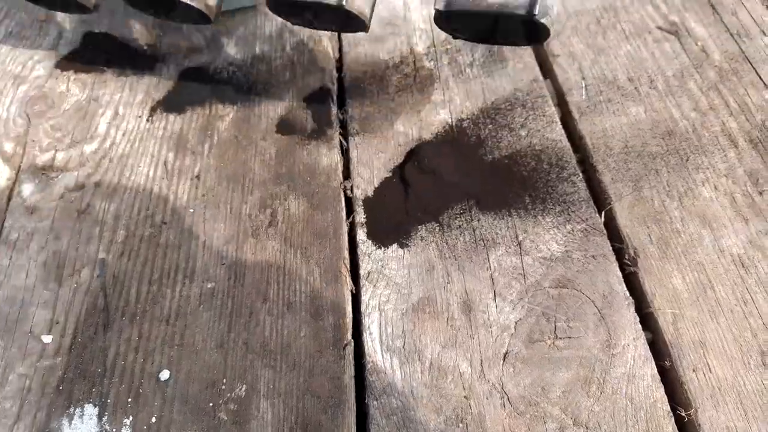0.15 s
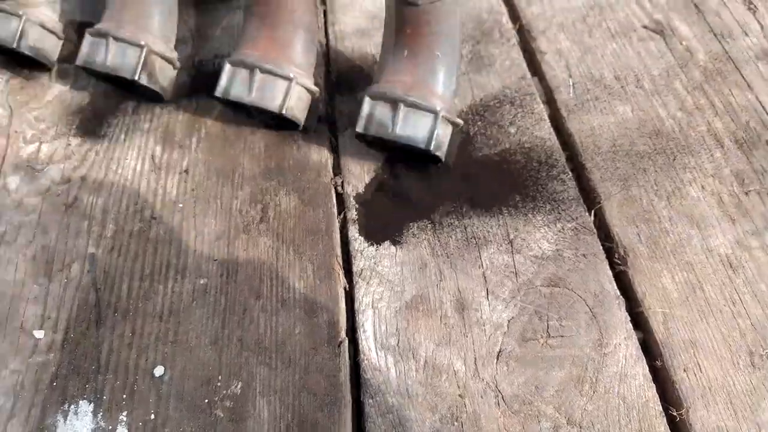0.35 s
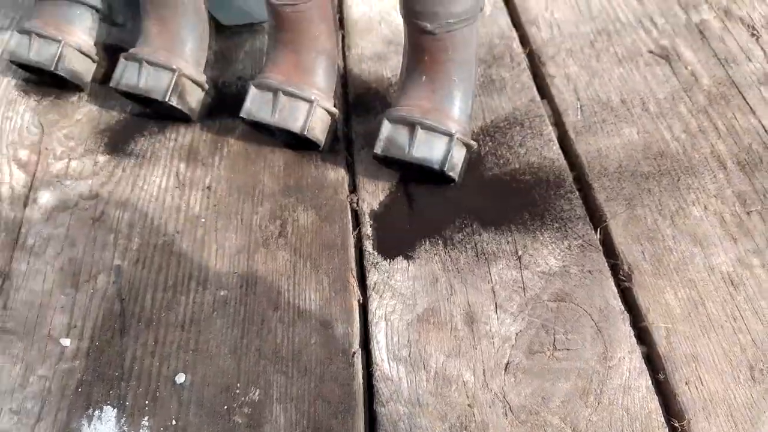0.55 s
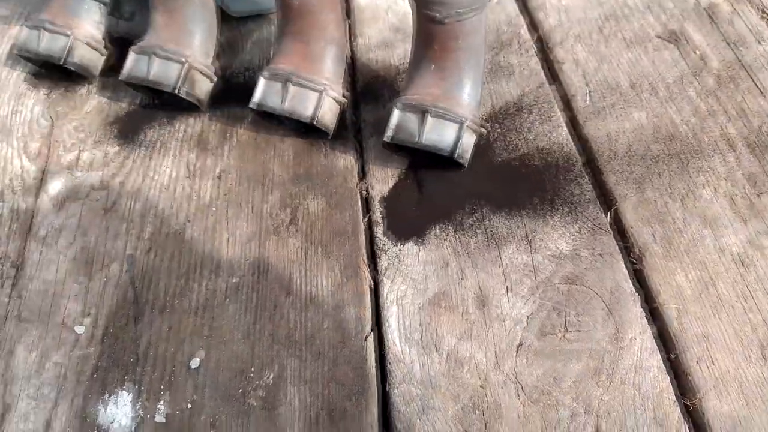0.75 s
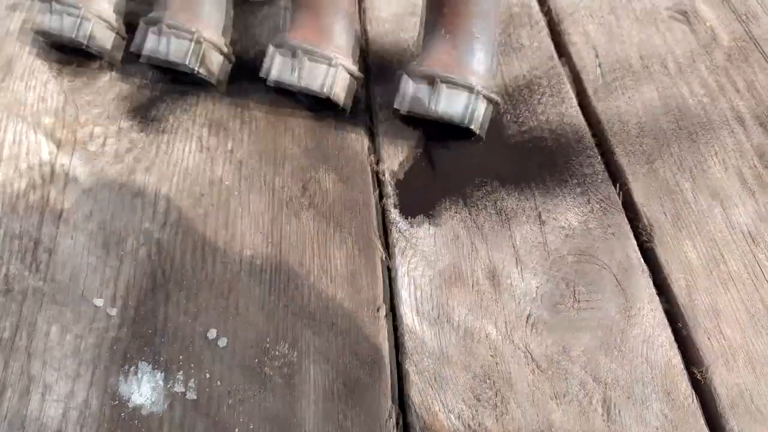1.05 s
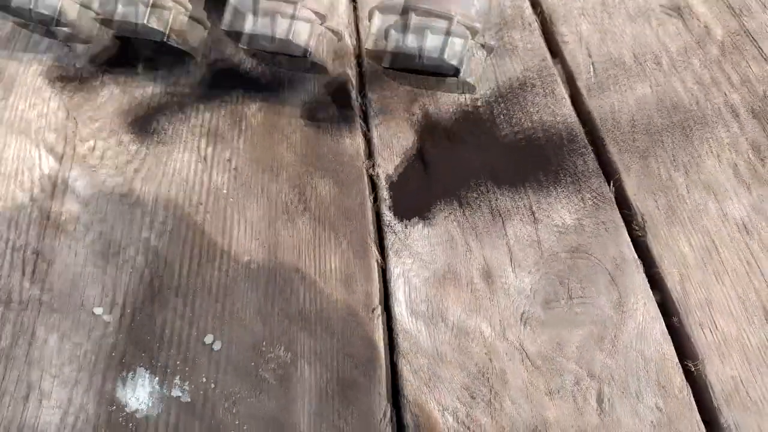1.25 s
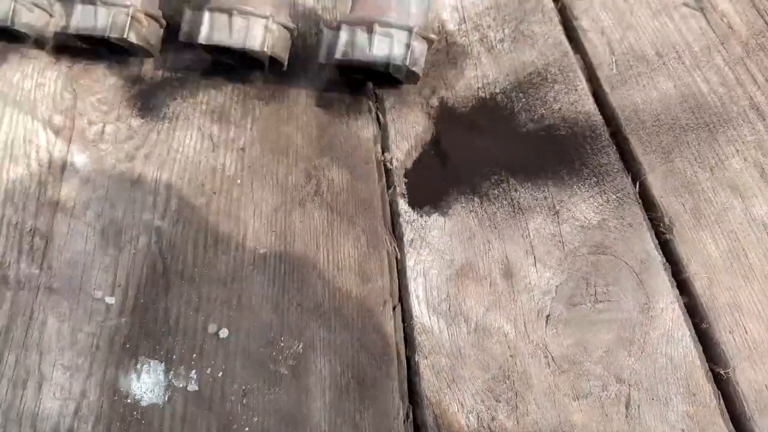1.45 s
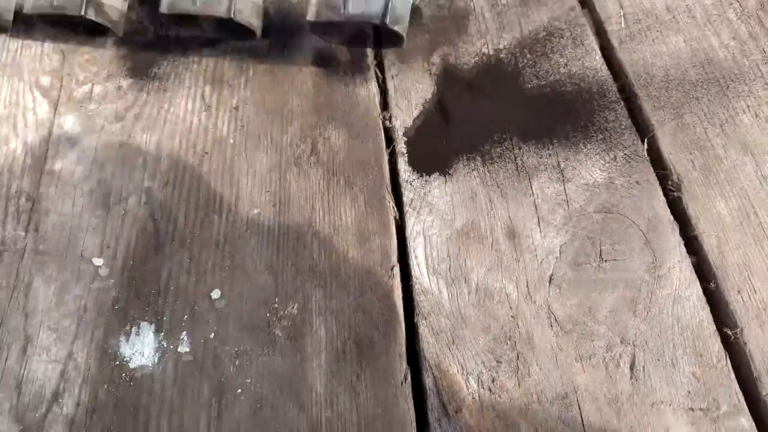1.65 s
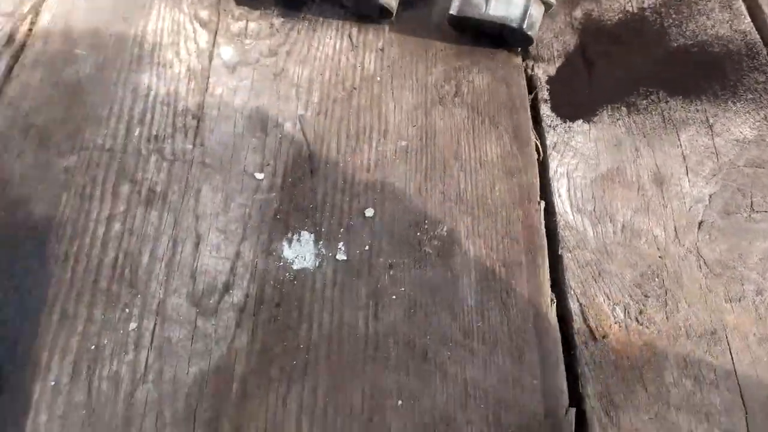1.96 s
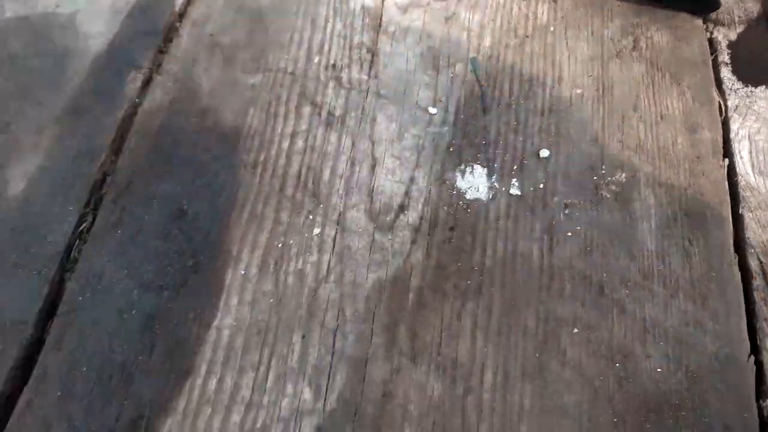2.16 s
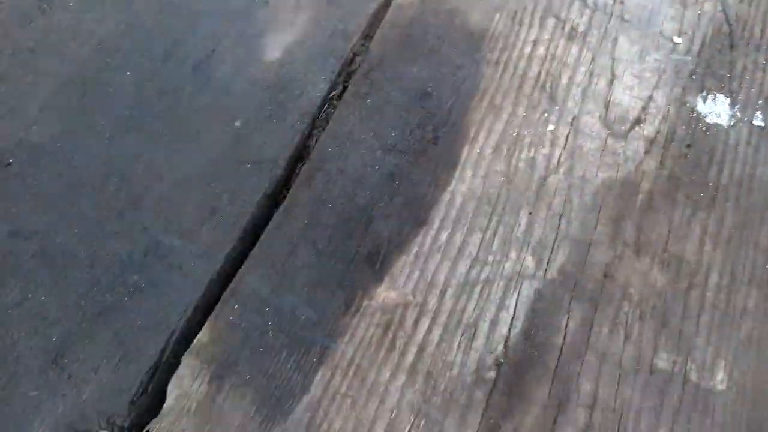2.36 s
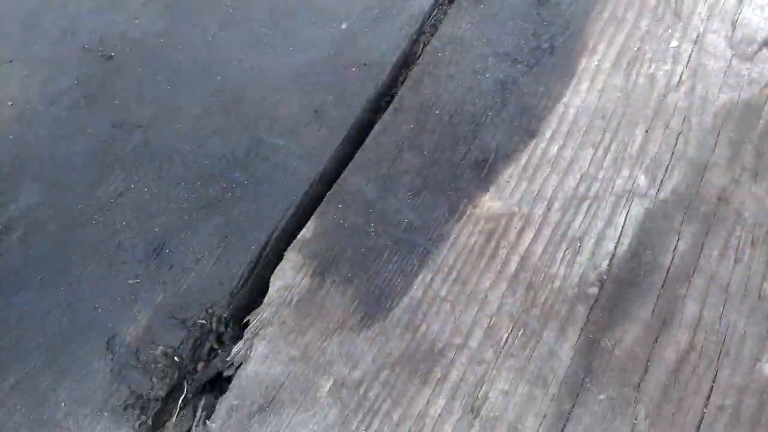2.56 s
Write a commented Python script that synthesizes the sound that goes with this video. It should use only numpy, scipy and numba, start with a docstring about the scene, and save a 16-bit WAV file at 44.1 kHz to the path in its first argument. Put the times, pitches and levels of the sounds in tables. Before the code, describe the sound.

Joined steel pipes clank sharply and clatter onto wooden boards, nearly go quiet, then bounce and rattle in a longer run, with plank thuds and fine grit, close to the microphone outdoors.

```python
"""A sharp steel clank at once, then a clatter: four joined pipes dropped on wooden boards, heard close up. They
all but rest, then bounce and rattle across the boards for longer. Each knock rings decaying pipe modes and
jangles a loose fitting over a run of rebounds. Planks thud with falling sines and booming noise; grit crackles
as sparse grains. A limiter ducks the loud blows, over a low outdoor rumble, a faint hiss and a brief thin tone
near 500 Hz."""
import sys
import numpy as np
from scipy import signal
from scipy.fft import rfft, irfft
from scipy.io import wavfile
from scipy.ndimage import uniform_filter1d
from numba import njit

SR = 44100
rng = np.random.default_rng(int(sys.argv[2]) if len(sys.argv) > 2 else 0)


def to_wav(s):
    """Save 16-bit WAV."""
    ch = np.atleast_2d(s).T  # columns
    pcm = np.round(np.clip(ch, -1, 1) * 32767)  # PCM
    wavfile.write(sys.argv[1], SR, pcm.astype(np.int16))


N = 119070
T = np.arange(N) / SR
AGE = T[:SR * 3 // 5]  # time since a blow, s
TOP_HZ = 15800


def undb(db):
    """Decibels to gain."""
    return 10 ** (np.asarray(db) / 20)


def fade(t60_s):
    """Exponential decay after a blow, -60 dB at t60_s."""
    return np.exp(-np.log(1000) * AGE / t60_s)


def add(out, start_s, sound):
    """Mix a sound in at a time."""
    i = max(int(start_s * SR), 0)
    out[..., i:i + sound.shape[-1]] += sound[..., :N - i]


def curve(points, hz, axis=1):
    """Read a table column on a log-frequency axis."""
    p = np.array(points, float)
    return np.interp(np.log(hz + 1), np.log(p[:, 0]), p[:, axis])


def noise(size):
    """Two unrelated white noises."""
    return rng.standard_normal((2, size))


# stereo image: f/Hz, side re mid/dB, left minus right/dB
IMAGE = [(40.4, 3, -3), (149, -11, -2.5), (510, -3.5, -2.5), (1300, 2, 0), (2170, 2.5, 3.5),
         (2900, -1.5, -1), (8160, 0.5, -0.5), (10040, 1, -21.5), (9380, -1, 0.5)]


def colour(white, points):
    """Give two unrelated signals a spectrum and the stereo image, at rms 1."""
    n = white.shape[-1]
    hz = np.fft.rfftfreq(n, 1 / SR)
    mid, side = rfft(white) * undb(curve(points, hz))
    width = undb(curve(IMAGE, hz))
    sign = np.array([[1], [-1]])  # left, right
    balance = undb(sign * curve(IMAGE, hz, axis=2) / 2)
    stereo = (mid + sign * width * side) / np.hypot(1, width)
    y = irfft(stereo * balance, n)
    return y / y.std()


def tilt(x, low_db, treble_db):
    """Shelve the low mids and the treble around the clang at 2-3 kHz."""
    n = x.shape[-1]
    shelf = [(1000, low_db), (1900, 0), (3200, 0), (6500, treble_db)]
    return irfft(rfft(x) * undb(curve(shelf, np.fft.rfftfreq(n, 1 / SR))), n)


# spectrum of cracks and fittings: f/Hz, level/dB per Hz
CLANK = [(40, -10.5), (130, -7.5), (250, -12), (500, -9), (830, -4), (1030, -12), (1250, -5), (1600, -2.5),
         (2200, 1.5), (2900, -0.5), (3600, -12.5), (4600, -8.5), (5250, -12.5), (6300, -5.5), (7800, -2),
         (9200, -3), (10300, -9.5), (11000, -18.5), (12200, -14.5), (15500, -44)]
# modes of each pipe, by name: f/Hz, level/dB, t60/s
PIPES = { "A": [(790, -12, .25), (1810, -2, .15), (2197, -7, .22), (2228, -24, 1.1), (2740, 0, .19),
         (2775, -17, .5), (3973, -31, .7), (6255, -14, .35), (6912, -7, .16), (8263, -5, .16)],
         "B": [(775, -8, .35), (904, -9, .3), (1480, -1, .22), (1914, -4, .18), (2718, -4, .18),
         (2837, -8, .2), (3068, -2, .28), (5992, -6, .22), (6718, -5, .18), (8178, -2, .2), (8258, -2, .28),
         (9308, -2, .2)], "C": [(1235, -7, .2), (1850, -4, .22), (2126, -1, .2), (2250, 0, .2),
         (2444, -4, .15), (2631, -3, .15), (2842, -5, .38), (6202, -9, .2), (7445, -1, .22), (8301, -4, .3),
         (9012, -1, .18)], "D": [(1249, -3, .25), (1825, -4, .15), (2058, 0, .15), (2276, 1, .15),
         (2848, 4.5, .29), (3192, 0, .28), (7603, 2, .17)]}
# pipe knocks: t/s, level/dB, low mids/dB, treble/dB, ring/dB, rattle length/s, pipe name
KNOCKS = [(0.0174, -16.5, -8, -6.5, -5, 0.0035, "A"), (0.161, -47, 17, 10, -19, 0.098, "A"),
          (0.204, -31.5, 11.5, -6, -21, 0.027, "A"), (0.2233, -7.5, -9, -0.5, -3, 0.007, "A"),
          (0.247, -10, 12, -1, -25, 0.012, "A"), (.258, -8, 0.5, -0.5, -28, 0.068, "A"),
          (0.3, -13, 9, -13, -27, 0.012, "A"), (0.324, -10, 7, -3, -21, 0.052, "A"),
          (0.36, -9.5, -10.5, -4, -3, 0.016, "A"), (0.389, -20.5, 14, 8, -15, 0.013, "A"),
          (0.506, -24.5, 0.5, -0.5, -3, 0.0026, "A"), (0.62, -37, 5, 4, -7, 0.0096, "A"),
          (1.077, -46.5, 7.5, -21, -7, 0.016, "A"), (1.399, -28.5, 1.5, -1.5, -21, 0.03, "B"),
          (1.417, -6.5, 2, -3, -29, 0.012, "B"), (1.44, -10, -4, -3, 0, 0.019, "B"),
          (1.471, -7, 0.5, -2, -20, 0.04, "B"), (1.507, -6, 1, -4.5, -13, 0.036, "B"),
          (1.529, -12.5, 2.5, -2.5, -1.5, 0.041, "B"), (1.602, -15, 2, 1, -2.5, 0.04, "B"),
          (1.652, -16.5, -1.5, 2.5, 2, 0.032, "B"), (1.674, -6, 2, 0, -18, 0.0057, "B"),
          (1.693, -7.5, -1, -5, -14, 0.045, "B"), (1.729, -13.5, 4.5, -1, -4, 0.033, "B"),
          (1.763, -9, 2.5, -1.5, -20, 0.038, "B"), (1.807, -11, 4, -4.5, -10, 0.052, "B"),
          (1.83, -9, 1.5, 0, -24, 0.027, "B"), (1.898, -15.5, -6, 3, 0, 0.0094, "B"),
          (1.935, -14.5, -3.5, -3.5, -3.5, 0.063, "C"), (2.02, -9, -3.5, -0.5, -1.5, 0.022, "C"),
          (2.053, -10.5, -5, 2, -24, 0.017, "C"), (2.071, -7, 0.5, 0.5, -14, 0.019, "C"),
          (2.1, -19, -1, 4, 3, 0.099, "C"), (2.164, -8, -4.5, -5.5, -7, 0.057, "C"),
          (2.202, -11.5, -2, 2, -22, 0.065, "C"), (2.233, -4.5, 3.5, 1, -2.5, 0.0062, "C"),
          (2.2808, -8.5, -35, -8, -2, 0.0031, "C"), (2.31, -31, -12, 3, 0.5, 0.087, "C"),
          (2.364, -23.5, 0, 10, 3, 0.024, "D"), (2.388, -5.5, -0.5, 0, -6.5, 0.015, "D")]
RING_DB, NEIGHBOUR_DB = -7.5, -18
CRACK_T60_S, CRACK_DB = .025, -1
FITTING_DB = -0.5


def pipes():
    """Each contact cracks and jangles a fitting; the struck pipe and joined frame ring up over rebounds."""
    out = np.zeros((2, N))
    rings = {name: ring(modes) for name, modes in PIPES.items()}
    frame = undb(NEIGHBOUR_DB) * sum(rings.values())
    fittings = {name: fitting() for name in PIPES}
    cracks = colour(noise(N), CLANK)
    snap = undb(CRACK_DB) * fade(CRACK_T60_S)
    end_fade = np.minimum(1, 10 * (AGE[-1] - AGE))
    for start_s, db, low_db, treble_db, ring_db, length_s, name in KNOCKS:
        start = rng.integers(N - len(AGE))
        force = contacts(length_s)
        crack = cracks[:, start:start + len(AGE)] * snap
        clank = crack + undb(FITTING_DB) * jangle(*fittings[name])
        rattle = signal.fftconvolve(clank, force[None], axes=1)[:, :len(AGE)]
        build_up = np.sqrt(np.cumsum(force ** 2))
        tone = undb(RING_DB + ring_db) * (rings[name] + frame) * build_up
        add(out, start_s, undb(db) * tilt(rattle + tone, low_db, treble_db) * end_fade)
    return out


def ring(modes):
    """One pipe's decaying modes, each reaching the two sides a quarter cycle apart."""
    out = 0
    for hz, db, t60_s in modes:
        quarter = rng.choice([-1, 1]) * np.array([[0], [np.pi / 2]])
        phase = rng.uniform(0, 2 * np.pi) + quarter
        out = out + undb(db) * np.sin(2 * np.pi * hz * AGE + phase) * fade(t60_s)
    return out


RATTLE_PER_S, RATTLE_DB, RATTLE_SCATTER_DB = 220, -5, 4.5


def contacts(length_s):
    """Impulses: a first contact, then up to 40 rebounds of scattered force, dying off past length_s."""
    place, size = rng.random(size=40), rng.standard_normal(size=40)
    when_s = (np.arange(len(place)) + 1 + place) / RATTLE_PER_S
    die_off = 1 / (1 + (when_s / length_s) ** 4) ** .5
    force = undb(RATTLE_DB + RATTLE_SCATTER_DB * size) * die_off
    out = np.zeros(len(AGE))
    out[np.minimum((when_s * SR).astype(int), len(AGE) - 1)] = force
    out[0] = 1
    return out


FITTING_GAP_HZ, FITTING_SCATTER_DB = 65, 4


def fitting():
    """The many modes of a loose fitting, one per frequency slot: pitches in Hz, strengths in dB."""
    slots = np.arange(1, TOP_HZ // FITTING_GAP_HZ)
    hz = (slots + rng.random(len(slots))) * FITTING_GAP_HZ
    return hz, FITTING_SCATTER_DB * rng.standard_normal(len(slots))


FITTING_T60_S, CONTACT_SCATTER_DB = 0.092, 5.5


def jangle(hz, db):
    """Each knock favours other modes of the fitting; the lowest ones answer more evenly."""
    evenness = np.minimum(hz / 1500, 1)
    db = (db + CONTACT_SCATTER_DB * rng.standard_normal(len(hz))) * evenness
    lines = np.zeros((2, len(AGE) // 2 + 1), complex)
    phases = np.exp(2j * np.pi * rng.random((2, len(hz))))
    lines[:, (hz * len(AGE) / SR).astype(int)] = undb(db) * phases
    return colour(irfft(lines, len(AGE)), CLANK) * fade(FITTING_T60_S)


# deck boom spectrum: f/Hz, level/dB per Hz
DECK = [(30, -10), (60, -40), (120, 11), (200, 17.5), (400, -18), (750, -10), (1500, -13.5)]
# plank thuds: t/s, level/dB
THUDS = [(.246, -1.5), (0.656, -35), (0.736, -31.5), (0.755, -32.5), (.985, -43), (1.034, -44),
         (1.162, -40.5), (1.3, -44), (1.326, -38), (1.417, -7.5), (1.531, -47), (1.698, -8.5), (1.821, -18),
         (1.942, -37), (2.235, -17.5), (2.687, -25)]
PLANK_HZ, PLANK_SWEEP_HZ, SWEEP_S, PLANK_T60_S = 156, 280, .008, .11
DECK_DB, DECK_T60_S = -14, .22


def planks():
    """A bending wave drops in pitch and gains weight as it spreads along the plank; the deck booms with it."""
    out = np.zeros((2, N))
    hz = PLANK_HZ + PLANK_SWEEP_HZ * np.exp(-AGE / SWEEP_S)
    weight = np.sqrt(PLANK_HZ / hz)
    bend = -np.sin(2 * np.pi * np.cumsum(hz) / SR) * fade(PLANK_T60_S) * weight
    for start_s, db in THUDS:
        boom = colour(noise(len(AGE)), DECK) * fade(DECK_T60_S)
        add(out, start_s, undb(db) * (bend + undb(DECK_DB) * boom))
    return out


# grit spectrum: f/Hz, level/dB per Hz
GRIT = [(200, 9.5), (800, 11), (2500, 10), (5000, -3), (9000, 2.5), (11000, -6.5), (15500, -25)]
# soft scrapes: centre t/s, length (Gaussian sigma)/s, level/dB, treble/dB
SCRAPES = [(.0, 0.056, -40, 9.5), (0.937, 0.021, -51.5, 17), (1, 0.011, -59, 22),
           (1.381, 0.023, -48.5, 12.5), (2.566, 0.024, -43.5, -5)]
GRIT_PER_S, GRIT_DB, GRIT_FALL_S = 360, -19.5, 0.043


def grit():
    """Sparse grains shaken loose by each knock, and soft scrapes over them."""
    shake = np.zeros(N)  # energy
    for start_s, db, *_ in KNOCKS:
        add(shake, start_s, undb(db) ** 2 * np.exp(-AGE / GRIT_FALL_S * 2))
    grains = noise(N) * (rng.random(N) < GRIT_PER_S / SR)
    out = colour(grains, GRIT) * np.sqrt(shake) * undb(GRIT_DB)
    rub = colour(noise(N) + 10 * grains, GRIT)
    for centre_s, length_s, db, treble_db in SCRAPES:
        swell = np.exp(-.5 * ((T - centre_s) / length_s) ** 2)
        out += tilt(rub, -treble_db, treble_db) * undb(db) * swell
    return out


# rumble and hiss spectra: f/Hz, level/dB per Hz
RUMBLE = [(15, -4), (25, 6.5), (95, -6), (170, -7), (210, -10.5), (281, -23.5), (600, -41), (900, -100)]
HISS = [(350, -27), (600, -1.5), (2000, -5.5), (6400, -7.5), (9120, 2.5), (15500, -22)]
# rumble level: t/s, level re RUMBLE_DB/dB
RUMBLE_LEVEL = [(.1, 4), (.4, 10.5), (.9, 2.5), (1.8, 7.5), (2.05, -1.5), (2.7, -2.5)]
RUMBLE_DB, RUMBLE_WAVER_DB, HISS_DB = -40.5, -0.5, -52.5
TONE_HZ, TONE_DB, TONE_ENDS_S = 513, -50.5, 0.14


def outdoors():
    """Low noise of uneven level under a faint hiss; a thin sine tone near 500 Hz fades out early."""
    waver = colour(noise(N), [(1, 0), (15, 0), (40, -60), (200, -120)])[0]
    drift_db = np.interp(T, *np.array(RUMBLE_LEVEL).T)
    rumble = colour(noise(N), RUMBLE) * undb(RUMBLE_DB + drift_db + RUMBLE_WAVER_DB * waver)
    hiss = colour(noise(N), HISS) * undb(HISS_DB)
    faint_tone_gate = np.clip(20 * (TONE_ENDS_S - T), 0, 1)
    faint_tone = undb(TONE_DB) * np.sin(2 * np.pi * TONE_HZ * T) * faint_tone_gate
    return rumble + hiss + faint_tone


YARD_T60_S, YARD_DB = 0.19, -27.5


def scene():
    """Pipes, planks and grit with a faint diffuse echo from the yard, over the outdoors."""
    near = pipes() + planks() + grit()
    echo = noise(len(AGE)) * fade(YARD_T60_S) * np.minimum(AGE / 0.015, 1)
    echo /= np.sqrt((echo ** 2).sum(axis=1, keepdims=True))  # unit energy
    yard = undb(YARD_DB) * signal.fftconvolve(near, echo, axes=1)[:, :N]
    return near + yard + outdoors()


@njit
def follow(x, attack, release):
    """Level follower that rises fast and falls slowly."""
    out, e = np.empty(len(x)), 0.
    for i in range(len(x)):
        e += (x[i] - e) * (attack if x[i] > e else release)
        out[i] = e
    return out


LIMIT_DB, LIMIT_ATTACK_S, LIMIT_RELEASE_S = -7.5, .0012, .09


def record(dry):
    """A limiter ducks everything under loud blows; peaks clip and the top is cut."""
    dry = signal.sosfilt(signal.butter(2, 20, "high", fs=SR, output="sos"), dry)
    rms = np.sqrt(np.abs(uniform_filter1d((dry ** 2).mean(axis=0), size=180)))
    held = follow(rms, 1 / (LIMIT_ATTACK_S * SR), 1 / (LIMIT_RELEASE_S * SR))
    limited = dry / (1 + (held / undb(LIMIT_DB)) ** 4) ** (1 / 4)
    top_cut = signal.ellip(8, .2, 70, TOP_HZ, fs=SR, output="sos")
    return signal.sosfilt(top_cut, np.clip(limited, -1, 1))


dry = scene()
out = record(dry)
to_wav(out)
```